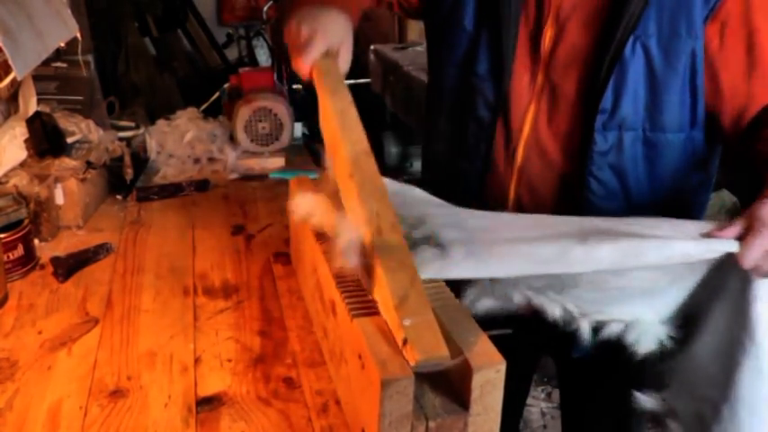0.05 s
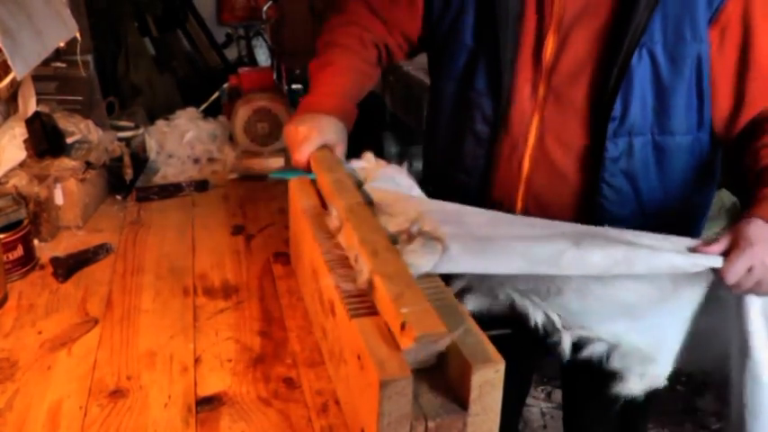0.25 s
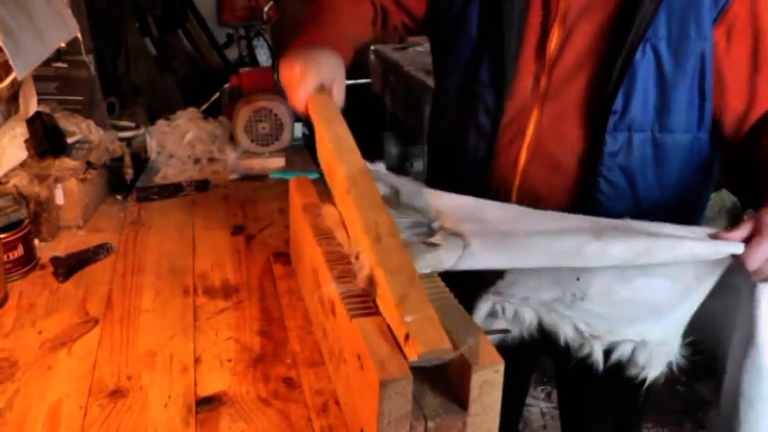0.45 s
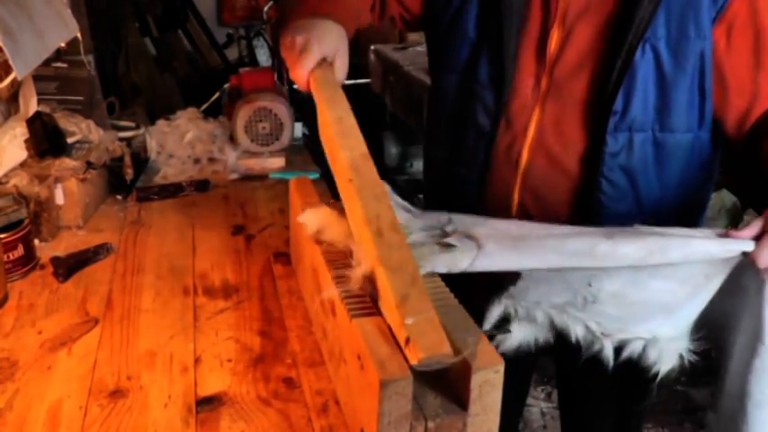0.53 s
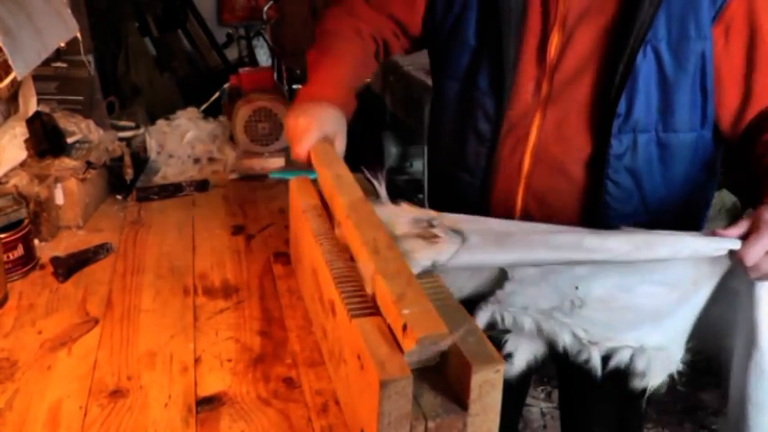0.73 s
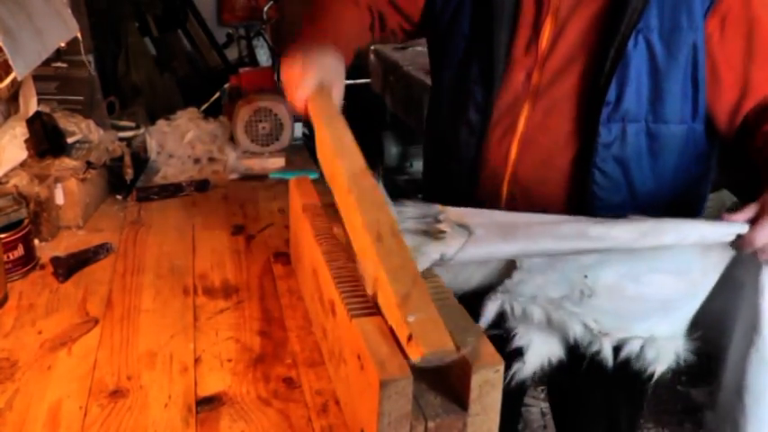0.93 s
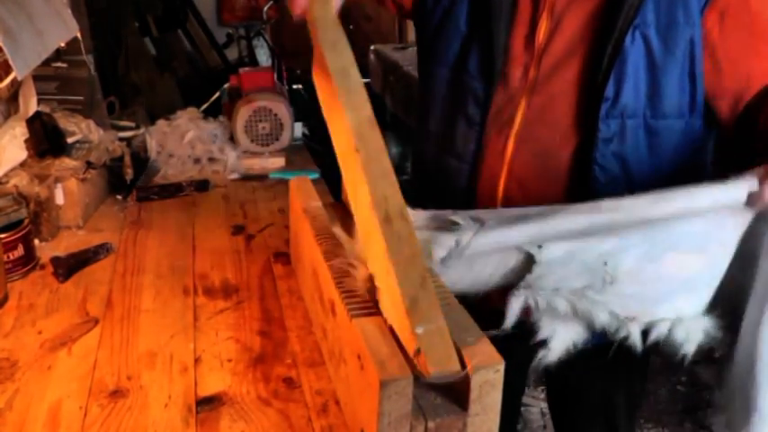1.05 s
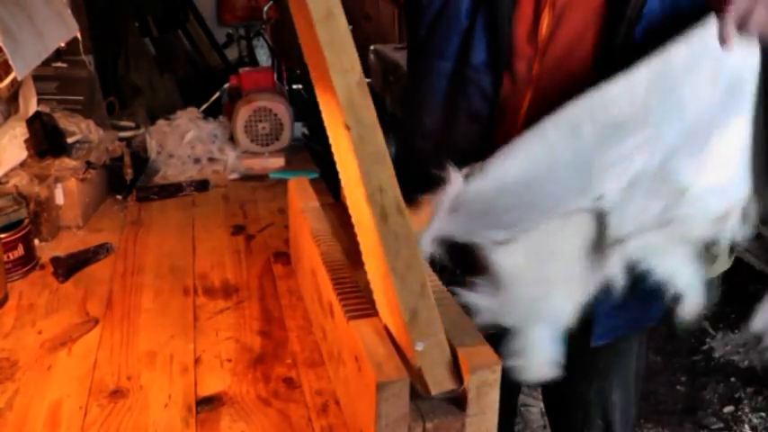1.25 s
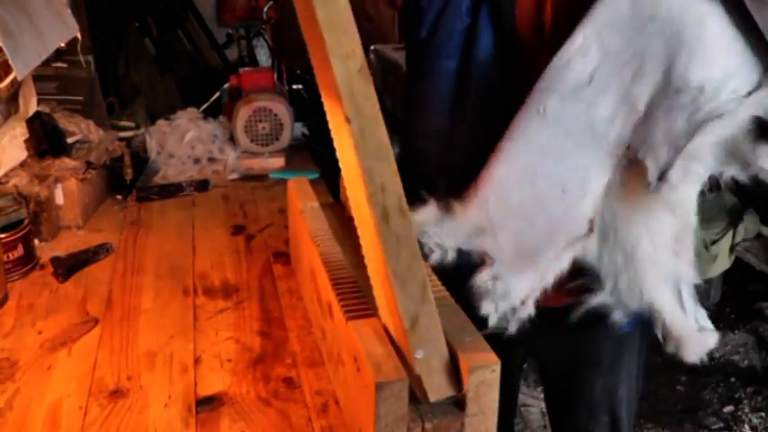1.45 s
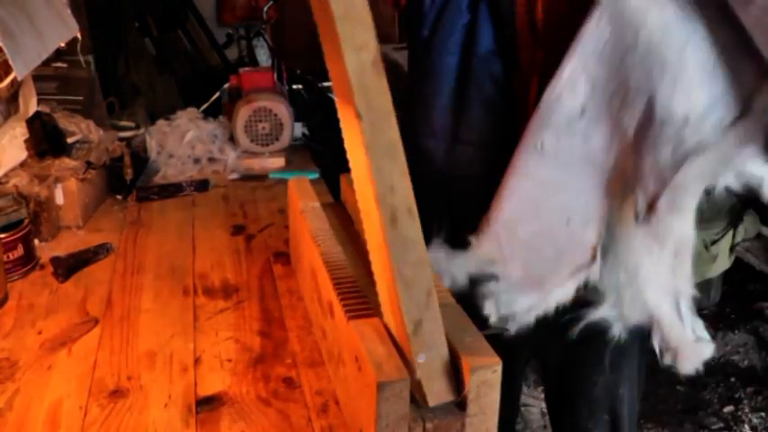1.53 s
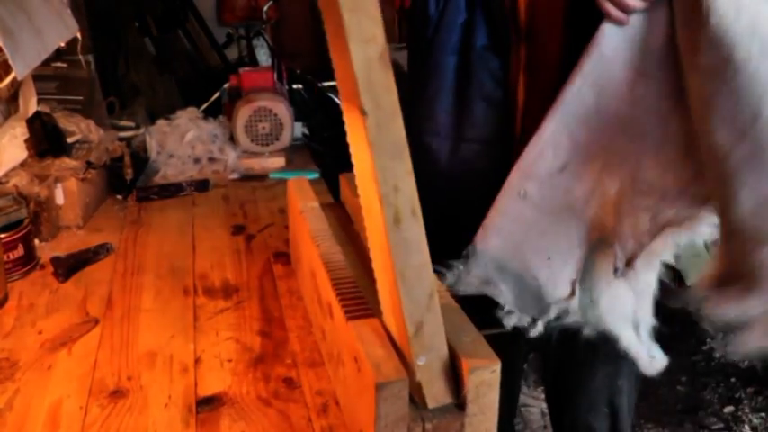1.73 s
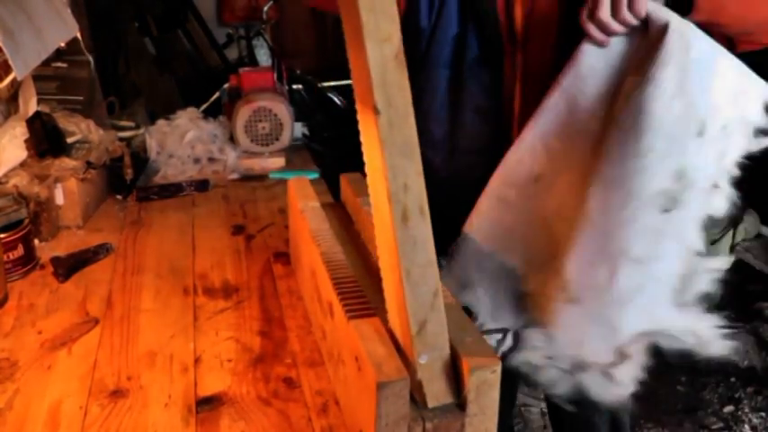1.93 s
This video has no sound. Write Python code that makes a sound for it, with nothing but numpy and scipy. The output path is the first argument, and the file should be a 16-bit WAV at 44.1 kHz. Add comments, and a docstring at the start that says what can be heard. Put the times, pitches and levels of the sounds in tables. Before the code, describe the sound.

Wooden lever thumps shut twice on a dragged hide, with scraping and a light rattle.

```python
"""Hide in a wooden lever tool

A hide is dragged through the toothed jaws of a lever tool on a bench in a small cluttered workshop.
The lever is pressed down twice: the fur hisses and squeaks, and the wood shuts with a thump as the
impact excites its damped modes. Friction from the drag sets the bench droning.
Then the hide is drawn out and the raised lever rattles in its pivot."""
import sys
import numpy as np
from scipy import signal
from scipy.fft import rfft, irfft, next_fast_len
from scipy.io import wavfile
from scipy.ndimage import map_coordinates

SR = 44100
rng = np.random.default_rng(int(sys.argv[2]) if len(sys.argv) > 2 else 0)


def output_pcm(signal):
    """Save a mono or channel-first signal as 16-bit PCM at the path in sys.argv[1].

    Samples are clipped to [-1, 1] before scaling.
    """
    pcm = np.clip(np.atleast_2d(signal).T, -1, 1) * 32767
    wavfile.write(sys.argv[1], SR, np.round(pcm).astype(np.int16))


N = 88200

# Likeness of the two channels of a noise. Each row: frequency in Hz, correlation.
STEREO_CORRELATION = [(100, 0.8), (400, 0.71), (1000, 0.48), (3000, 0.85), (8000, 0.77), (14000, 0.47)]
# Decay of the room. Each row: frequency in Hz, time to fall 60 dB (T60) in seconds.
ROOM_T60 = [(120, 0.41), (1000, 0.29), (4000, 0.38), (12000, 0.11)]
# Sound fed to the reverberation. Each row: frequency in Hz, gain in dB.
ROOM_SEND_GAIN = [(100, -19), (300, -13), (900, -18.5), (3000, -17.5), (10000, 3)]

# Spectra of the noises. Each row: frequency in Hz, relative spectral density in dB.
ROOM_TONE_SPECTRUM = [(25, 5), (62, 22), (110, 23), (400, -2), (800, -29), (1500, -7), (2300, -35),
                      (7000, -2), (15000, -21)]
SWISH_SPECTRUM = [(4000, -2), (9000, 2.5), (11500, -3.5), (15500, -13)]
HISS_SPECTRUM = [(500, 2.5), (1500, 2), (2250, -5), (3400, -2), (4700, -5.5), (7000, -4), (9500, -11.5),
                 (11500, -23.5), (15500, -29)]
RASP_SPECTRUM = [(100, -33), (190, 1.5), (275, 1.5), (540, -1.5), (780, 3.5), (980, -8.5), (1380, -2.5),
                 (2100, -20.5), (5000, -51)]
CLICK_SPECTRUM = [(300, -4), (1900, -6), (2800, 0), (4100, -1), (5000, -11), (14000, -32)]

# Envelopes of the motion. Each row: time in seconds, relative level in dB.
SWISH_ENVELOPE = [(0, -64), (.18, -59.5), (.27, -61), (.32, -98), (.68, -71), (.77, -59), (.89, -77),
                  (1.13, -60), (1.45, -70), (1.72, -59.5), (1.8, -71)]  # loose fur moving through the air
BENCH_ENVELOPE = [(0, -36.5), (.05, -38.5), (.09, -46.5), (.13, -32), (.17, -49), (.24, -23), (.3, -27),
                  (.36, -30.5), (.405, -36), (.435, -32), (.49, -51), (.7, -60), (.75, -44.5), (.79, -66),
                  (.83, -36), (.93, -46), (1.08, -43), (1.12, -37), (1.17, -60), (1.23, -54), (1.3, -36),
                  (1.4, -55), (1.645, -72), (1.695, -30), (1.735, -46), (1.85, -55.5), (2, -66)]  # bench shaken by the drag and the swinging lever
DRAG_ENVELOPE = [(0, -48.5), (.04, -54.5), (.12, -54.5), (.21, -42), (.24, -37), (.275, -34), (.32, -60),
                 (.38, -61.5), (.44, -47), (.49, -54.5), (.62, -55.5), (.68, -63), (.76, -45.5), (.83, -47),
                 (.86, -62.5), (.9, -67), (1.02, -55), (1.3, -53.5), (1.4, -59.5), (1.56, -59), (1.74, -56),
                 (1.795, -70.5), (1.85, -63), (2, -68.5)]  # hide sliding over the teeth
RUB_ENVELOPE = [(0, -42), (.05, -46), (.14, -49), (.2, -37.5), (.23, -30), (.27, -35), (.33, -36),
                (.39, -46.5), (.42, -40.5), (.5, -52), (.63, -48.5), (.68, -58.5), (.76, -43), (.83, -39.5),
                (.89, -59.5), (.95, -50), (1.2, -52), (1.3, -48), (1.42, -57.5), (1.62, -62), (1.72, -48.5),
                (1.8, -56), (1.86, -58.5), (2, -56.5)]  # hide rubbing on the jaws
TEETH_ENVELOPE = [(.95, -8.5), (1.25, -7)]  # added to the drag: the teeth ring more freely as the lever lifts

# Resonances driven by friction. Each row: centre in Hz, width in Hz, relative level in dB.
BENCH_RUMBLE_BANDS = [(98.2, 40, -4.5), (137, 40, -11), (269, 28, -5)]
FUR_SQUEAK_BANDS = [(6930, 240, 1.5), (8100, 1200, -5), (9970, 340, -5.5)]

# Normal modes of the wooden parts. Each row: frequency in Hz, relative level in dB, T60 in seconds.
BENCH_MODES = [(133.6, 7.5, 0.16), (251, 8, 0.11), (273.7, -1.5, 0.22), (330.3, -22, 0.41), (371, 5, 0.094),
               (428.6, -3, 0.13)]
LEVER_MODES = [(623, -4, 0.14), (708, 8, 0.039), (762, 4, 0.05), (862, -8, 0.11)]
JAW_MODES = [(1129, 0, 0.093), (1238, 7.5, 0.039), (1340, 0, 0.097), (1460, 12, 0.022), (1622, -13.5, 0.18),
             (1825, 3, 0.018)]
TEETH_MODES = [(2630, -5, 0.031), (3350, 0, .026), (3605, -7, 0.017), (3858, 2, 0.042), (4230, -4, 0.045),
               (5690, -6.5, 0.0047)]

SLAM_CRACK_DB = -27.5  # click gain as the lever slams shut
# Impacts of wood on wood. Each row: start in seconds, gains of lever, bench, jaw and click in dB,
# factor on T60, left minus right in dB, frequency in Hz favoured by the struck spot.
IMPACTS = [ (.101, -40.5, -38, -45.5, -73, 1.1, 1.5, 783),
           (0.2725, -13.5, -9.5, -15.5, SLAM_CRACK_DB, 0.87, 5, 660),
           (0.408, -58, -34.5, -40, -56, 0.83, 5, 1280), (0.621, -50, -43.5, -50, -70, 1.4, 3.5, 283),
           (.796, -23.5, -25.5, -33.5, -46, 0.9, 5, 675), (0.805, -49, -33, -54, -52, 1.87, 4.5, 434),
           (.945, -35, -39.5, -70, -58.5, 0.54, 4, 620), (1.143, -49, -45, -68, -75, 1.7, 5.5, 810),
           (1.517, -42, -49.5, -43.5, -60, 0.97, 0.5, 840), (1.662, -36.5, -38, -54, -68, 0.93, 1.5, 787),
           (1.667, -34.5, -34.5, -41, -47, 0.62, 7.5, 1150), (1.734, -42, -39.5, -47, -46, 1.1, 6.5, 1530),
           (1.78, -25.5, -23, -36, -56.5, 0.1, 9.5, 1720),
           (1.8235, -39.5, -39.5, -38, -58.5, 0.34, 6.5, 770),
           (1.883, -63, -79, -48, -50.5, 0.53, 10, 1490), (1.889, -55, -74, -38.5, -65, 0.48, 2, 1100)]
# Further stereo balance of all impacts. Each row: frequency in Hz, left minus right in dB.
IMPACT_BALANCE = [(120, -5.5), (500, -6.5), (1100, 6), (2200, -10), (8000, -8.5)]
# Stereo phase of all impacts. Each row: frequency in Hz, lead of the left in radians.
IMPACT_PHASE_LEAD = [(150, -0.29), (700, 0.86), (1500, 0.95), (3000, -1.3)]


def amp(db):
    """Amplitude grows tenfold for every 20 dB."""
    return 10 ** (np.asarray(db) / 20)


def unit_rms(x):
    """Division by the rms gives a signal unit power."""
    return x / np.sqrt(np.mean(x ** 2) + 1e-20)


def at_frequency(points, hz):
    """Interpolation of (Hz, value) points on a logarithmic frequency axis."""
    frequencies, values = np.transpose(points)
    return np.interp(np.log(hz + 1), np.log(frequencies + 1), values)


def envelope(points):
    """Straight lines between (seconds, dB) points give exponential changes of gain."""
    return amp(np.interp(np.arange(N) / SR, *np.transpose(points)))


def wobble(knots_per_s):
    """A spline through random knots gives a smooth fluctuation."""
    return map_coordinates(rng.standard_normal(4096), [np.arange(N) * knots_per_s / SR], mode="wrap")


def filtered(x, response):
    """A linear filter multiplies the spectrum by its frequency response."""
    size = next_fast_len(N + SR // 2)
    return irfft(rfft(x, size) * response(np.fft.rfftfreq(size, 1 / SR)), size)[..., :N]


def colour(points):
    """The magnitude response through (Hz, dB) points."""
    return lambda hz: amp(at_frequency(points, hz))


def resonances(bands):
    """Parallel resonators add; squaring each response steepens its skirts."""
    return lambda hz: sum(amp(db) * (1j * hz * width / (centre ** 2 - hz ** 2 + 1j * hz * width)) ** 2
                          for centre, width, db in bands)


def noise(response):
    """Stereo noise of rms 1: the ratio of independent mid and side parts sets the correlation."""
    def mid_side_response(hz):
        angle = np.arccos(np.clip(at_frequency(STEREO_CORRELATION, hz), -1, 1)) / 2
        return response(hz) * np.array([np.cos(angle), np.sin(angle)])
    mid, side = filtered(rng.standard_normal((2, N)), mid_side_response)
    return unit_rms(np.array([mid + side, mid - side]))


def room_tone(level_db=-62):
    """Stationary coloured noise forms the quiet of the room."""
    return amp(level_db) * noise(colour(ROOM_TONE_SPECTRUM))


def reverberation(x):
    """Walls and clutter scatter sound into a diffuse field that decays exponentially in each band."""
    hz, t, spectra = signal.stft(rng.standard_normal((2, SR // 2)), SR, nperseg=256)
    decay = amp(-60 * t / at_frequency(ROOM_T60, hz)[:, None])
    tail = signal.istft(spectra * decay, SR, nperseg=256)[1]
    tail = np.pad(tail / np.linalg.norm(tail[0]), ((0, 0), (SR // 250, 0)))  # arrives 4 ms late
    send = filtered(x.mean(0), colour(ROOM_SEND_GAIN))
    return signal.fftconvolve(send[None], tail, axes=1)[:, :N]


def fur_swish():
    """Fur brushing through the air radiates soft, very high noise."""
    return envelope(SWISH_ENVELOPE) * noise(colour(SWISH_SPECTRUM))


def bench_drone(lowest_mode_hz=123.7, wander_hz=2, waver_db=1, rumble_db=-6.5):
    """Forced vibration: the drag sustains the lowest mode of the bench and stirs those around it."""
    phase = 2 * np.pi * np.cumsum(lowest_mode_hz + wander_hz * wobble(20.06)) / SR
    drone = unit_rms(np.sin(phase) * amp(waver_db * wobble(12)))
    rumble = amp(rumble_db) * noise(resonances(BENCH_RUMBLE_BANDS))
    return envelope(BENCH_ENVELOPE) * (drone + rumble)


def fur_squeak(peak_s=0.251, sigma_s=0.011, peak_db=-34):
    """Friction under full pressure excites high resonances as the jaws close on the fur."""
    swell = np.exp(-.5 * ((np.arange(N) / SR - peak_s) / sigma_s) ** 2)
    return amp(peak_db) * swell * noise(resonances(FUR_SQUEAK_BANDS))


def hide_scrape(hiss_gain_db=2.5, rasp_gain_db=1):
    """Stick-slip friction of hair and skin gives a grainy hiss, ringing teeth and a coarser rasp."""
    hiss = unit_rms(noise(colour(HISS_SPECTRUM)) * amp(0.33 * wobble(700) + 1.6 * wobble(57.73)))
    # The faster a mode decays, the wider its band.
    teeth_bands = [(hz, np.log(1000) / (np.pi * t60), db) for hz, db, t60 in TEETH_MODES]
    teeth = envelope(TEETH_ENVELOPE) * noise(resonances(teeth_bands))
    rasp = unit_rms(noise(colour(RASP_SPECTRUM)) * amp(2 * wobble(260) + 1.6 * wobble(45)))
    sliding = envelope(DRAG_ENVELOPE) * (amp(hiss_gain_db) * hiss + teeth)
    rubbing = envelope(RUB_ENVELOPE) * amp(rasp_gain_db) * rasp
    return sliding + rubbing


def struck_modes(modes, t, t60_factor, favoured_hz, rise_cycles):
    """Modal superposition: a blow excites damped sinusoids, and its position favours one pitch."""
    lag_cycles = 0.68  # bending waves are slower in the bass, so low modes start later
    boost_db, boost_octaves = 8, 0.16
    out = 0
    for hz, db, t60 in modes:
        age = np.maximum(t - lag_cycles / hz, 0)
        favour_db = boost_db * np.exp(-.5 * (np.log2(hz / favoured_hz) / boost_octaves) ** 2)
        start_db = db + favour_db + rng.standard_normal()
        decay = amp(start_db - 60 * age / (t60 * t60_factor))
        rise = 1 - np.exp(-age * hz / rise_cycles)
        out = out + decay * rise * np.sin(2 * np.pi * hz * age)
    return out / 2


def lever_knocks(click_hold_s=.004, click_t60_s=.009):
    """Impact excitation: each contact clicks, then rings the jaw, the lever and last the bench."""
    out = np.zeros((2, N + SR))
    t = np.arange(SR // 2) / SR
    sides = np.array([[.5], [-.5]])  # each channel takes half of a left-right difference
    click_fall_db = 60 * np.maximum(t - click_hold_s, 0) / click_t60_s
    for start_s, lever_db, bench_db, jaw_db, click_db, t60_factor, pan_db, favoured_hz in IMPACTS:
        jaw = amp(jaw_db) * struck_modes(JAW_MODES, t, t60_factor, favoured_hz, rise_cycles=1.4)
        lever = amp(lever_db) * struck_modes(LEVER_MODES, t, t60_factor, favoured_hz, rise_cycles=.9)
        bench = amp(bench_db) * struck_modes(BENCH_MODES, t, t60_factor, favoured_hz, rise_cycles=.7)
        click = amp(click_db - click_fall_db) * noise(colour(CLICK_SPECTRUM))[:, :len(t)]
        start = round(start_s * SR)
        out[:, start:start + len(t)] += (jaw + lever + bench + click) * amp(sides * pan_db)

    def stereo_response(hz):
        balance = amp(sides * at_frequency(IMPACT_BALANCE, hz))
        return balance * np.exp(1j * sides * at_frequency(IMPACT_PHASE_LEAD, hz))
    return filtered(out[:, :N], stereo_response)


def scene():
    """Superposition: the knocks, their reverberation, the friction sounds and the room tone add."""
    knocks = lever_knocks()
    return (knocks + reverberation(knocks) + hide_scrape() + fur_swish() + fur_squeak()
            + bench_drone() + room_tone())


def record(dry, low_cut_hz=37, top_hz=15700):
    """Band limiting: the microphone is a second-order high-pass, and nothing passes above top_hz."""
    return filtered(dry, lambda hz: (hz < top_hz) * hz ** 2 / np.sqrt(hz ** 4 + low_cut_hz ** 4))


dry = scene()
out = record(dry)
output_pcm(out)
```